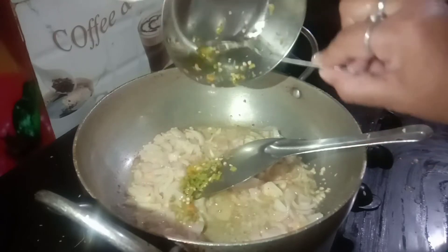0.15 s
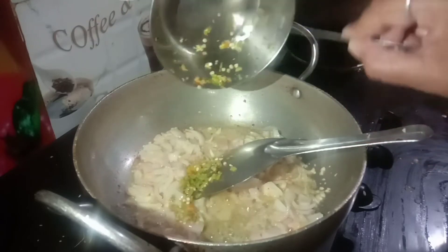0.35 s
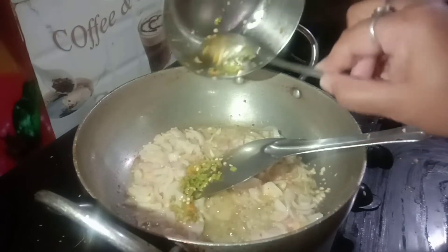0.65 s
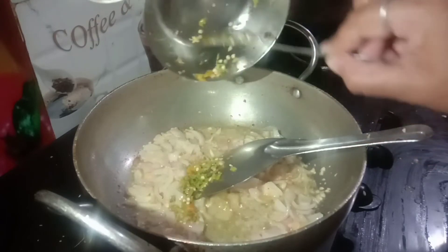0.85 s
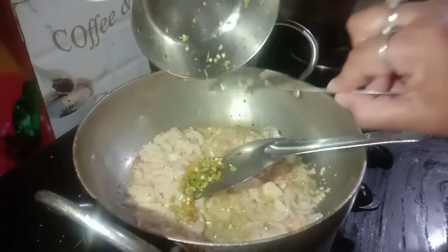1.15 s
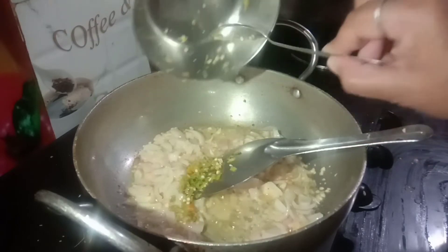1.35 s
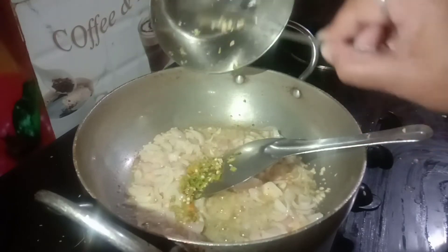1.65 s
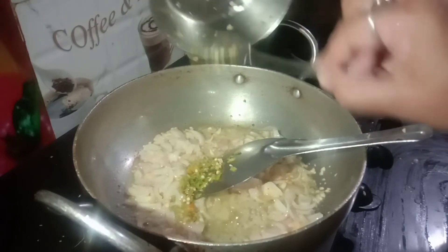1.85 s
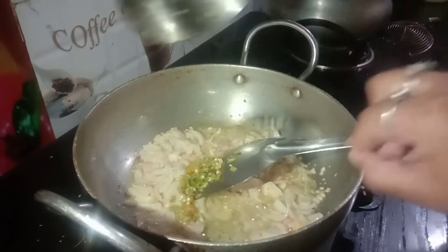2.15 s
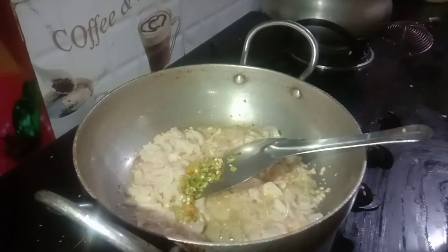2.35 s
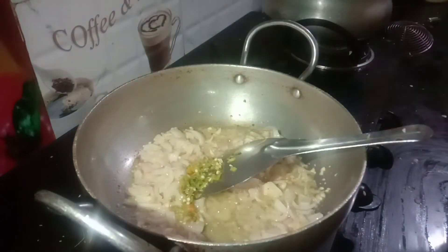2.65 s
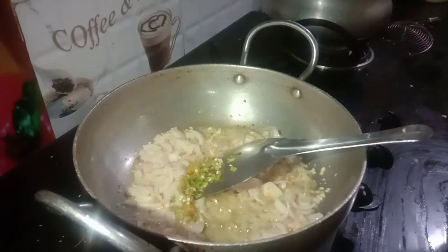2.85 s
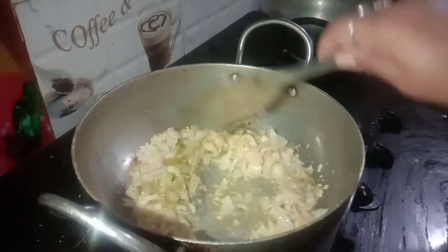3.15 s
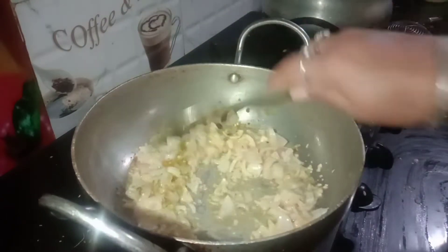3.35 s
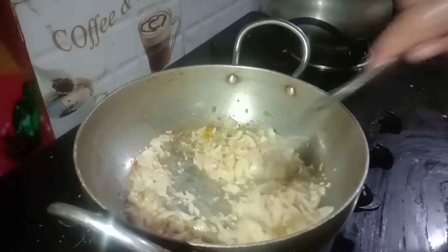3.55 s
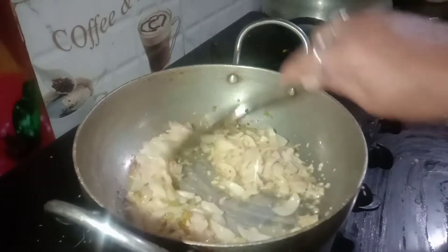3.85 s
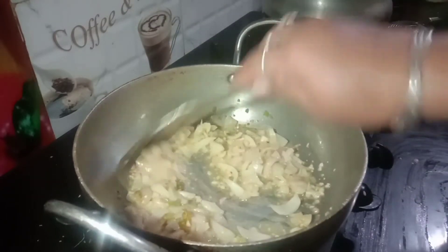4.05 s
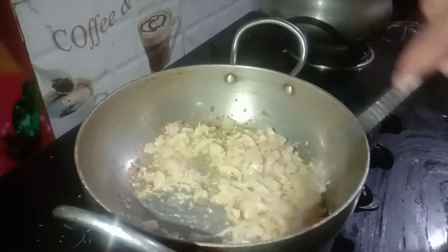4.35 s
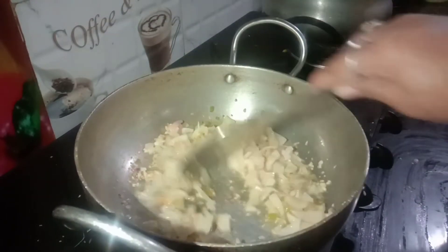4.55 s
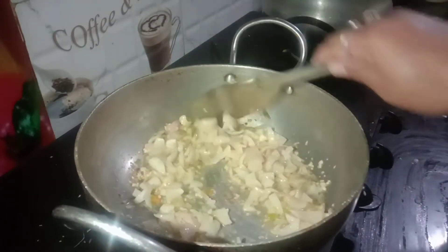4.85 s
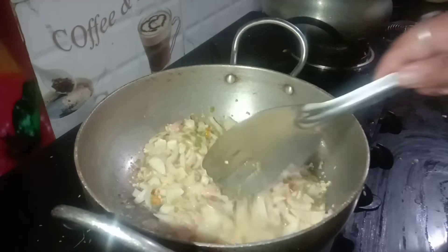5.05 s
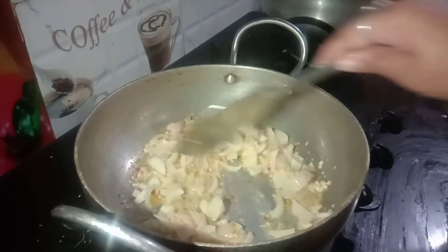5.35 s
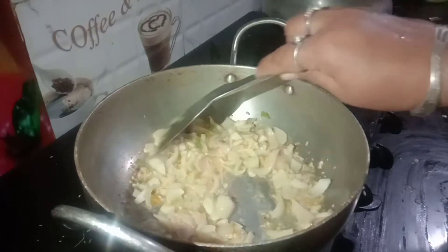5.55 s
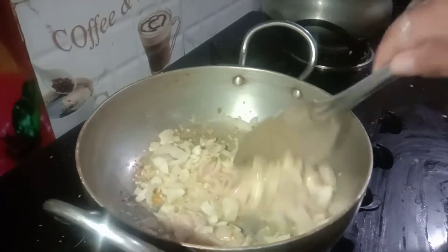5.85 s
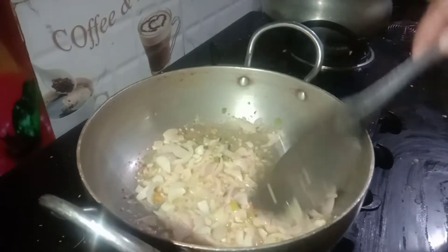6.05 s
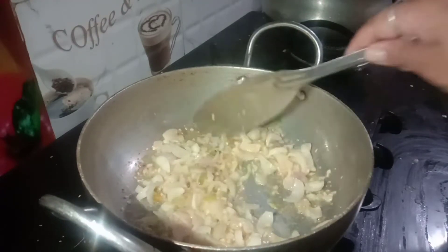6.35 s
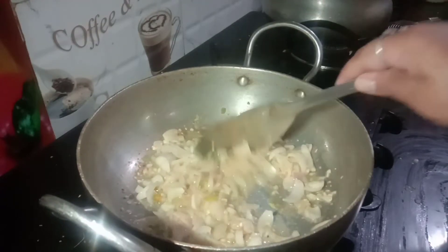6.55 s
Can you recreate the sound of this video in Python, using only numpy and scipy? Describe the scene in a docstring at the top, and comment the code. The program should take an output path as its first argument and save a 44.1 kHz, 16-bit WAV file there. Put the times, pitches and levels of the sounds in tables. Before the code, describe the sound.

Close crackling frying with small pops and spoon taps on a metal bowl, a brief dropout, then brisk metal spatula strokes scraping the pan.

```python
"""Onions sizzle in hot fat in a steel pan, close to the microphone in a small kitchen: random sparks over hiss.
A spoon clinks and rubs in a steel bowl (struck modes, stick-slip grit and squeals), while drops pop in the fat.
A hand reaches over the pan, and its delayed reflection hollows out the sizzle.
After a short break the sound fades back in with a louder frying, and a steel spatula knocks and scrapes
through the onions (noise through pan modes). A short room tail and a low hum lie behind; the sound drops out
again near the end."""
import sys
import numpy as np
from scipy import signal
from scipy.fft import rfft, irfft, next_fast_len
from scipy.io import wavfile
from scipy.ndimage import uniform_filter1d, minimum_filter1d, map_coordinates

SR = 44100
rng = np.random.default_rng(int(sys.argv[2]) if len(sys.argv) > 2 else 0)


def unload_wav(signal):
    """Save mono or channel-first audio to the path in sys.argv[1] as 16-bit WAV at rate SR, clipped to [-1, 1]."""
    wavfile.write(
        sys.argv[1],
        SR,
        np.round(np.clip(np.atleast_2d(signal).T, -1, 1) * 32767).astype(np.int16),
    )


N = 295227

# Levels in the tables are relative: the functions add fixed lifts, and the microphone colours the sum.
# Colour of the fat under still onions, and under turned ones: (frequency [Hz], level [dB])
RESTING_COLOUR = [(60, -32), (250, -9.5), (420, -10.5), (1000, -11.5), (1500, -2), (2150, 2), (2550, -3.5),
                  (2900, 2.5), (3600, 0.5), (5000, 1.5), (9000, -1), (13000, -4), (15000, -2.5)]
STIRRED_COLOUR = [(60, -13.5), (350, -18.5), (600, -14.5), (1050, -14.5), (1500, -11.5), (1900, -3.5),
                  (2300, -5.5), (2900, -3.5), (4000, -1.5), (5900, 1.5), (9000, -2), (15000, 0)]
# Loudest bursts of water in the fat: (time [s], level [dB], pitch [Hz], spray over that level [dB])
POPS = [(0.2646, -16.5, 2360, -1.5), (0.3317, -25, 5500, -1), (0.838, -17, 4800, 4.5),
        (1.9001, -19.5, 4950, 0), (1.9596, -16.5, 5550, 5), (1.9786, -19.5, 5780, 4),
        (2.1363, -25, 5700, 2), (2.2675, -25, 6180, -8), (2.3999, -25.5, 5470, 4), (2.6346, -24, 5820, 3.5),
        (2.824, -25, 6300, 7), (3.1255, -32, 4900, 9), (3.605, -15.5, 5670, 2), (4.8955, -11, 5570, -5)]
# Spray of a pop, and crack of a knock: (frequency [Hz], level [dB])
SPRAY_COLOUR = [(300, -13), (1800, 3), (5000, -7), (8000, -2), (13000, -1.5), (15500, -9)]
# Spoon meets bowl:
# (time [s], bowl ring [dB], spoon ring [dB], click [dB], most excited frequency [Hz])
CLINKS = [(.011, -28, -14.5, -13, 1210), (.153, -49, -16.5, -23, 3170), (.389, -23, -40, -19.5, 810),
          (1.699, -16, -42, -9.5, 2100), (1.75, -20.5, -37, -24, 4440)]
# Ringing modes of bowl and spoon: (frequency [Hz], level [dB], t60 [s])
BOWL_MODES = [(482.5, -3.5, 0.39), (1281, -3, .16), (1434, -4.5, 0.73), (2455, -8.5, 0.96), (3580, 2, 0.39),
              (3680, -3, 0.17), (3643, -4, 0.36), (4260, -9, 0.096), (5286, -8.5, 0.67), (5700, -16, 0.17)]
SPOON_MODES = [(870, 1.5, 0.066), (1570, 4.5, 0.051), (1470, -21, 0.13), (2373, 2, 0.51), (2405, 10, 0.073),
               (2585, -12.5, 0.82), (3700, -12.5, 0.304), (4950, -4, 0.2), (5580, 0.5, 0.23)]
# Spoon slides on the bowl's wall:
# (middle [s], half length [s], rub [dB], squeal frequency [Hz], squeal [dB])
RUBS = [(.05, 0.038, -36, 2990, -28), (.088, 0.026, -21.5, 5730, -23.5), (.21, 0.014, -28, 15200, -31),
        (.465, 0.024, -27, 15000, -25), (.67, 0.036, -26.5, 2370, -29), (1.434, 0.037, -33.5, 15000, -31.5),
        (1.758, 0.01, -29, 2395, -18.5), (1.785, 0.058, -26, 15200, -34)]
# Resonances of the rubbed wall: (frequency [Hz], width [Hz], level [dB])
RUB_MODES = [(2530, 77, -2), (3860, 50, 3), (5330, 170, 1), (5930, 50, -1), (7140, 240, -1),
             (8200, 320, -3.5), (8900, 170, 3), (10790, 290, 3.5), (13000, 430, 2), (15100, 250, -9.5),
             (15100, 200, 5.5)]
# Spatula strikes the pan: (time [s], click [dB], pan ring [dB], blade ring [dB], blade pitch [Hz])
KNOCKS = [(3.291, -18.5, -23.5, -15, 3940), (3.785, -3, -16, -9, 4200), (4.076, -5.5, -3, -25, 4350),
          (4.527, -14.5, -22, -26, 4420), (5.166, 4, -11.5, -4, 4280), (5.194, -4.5, -11.5, -2.5, 6000),
          (5.228, -19, -25, -1, 4370), (5.251, -8, -18, -6.5, 6030), (5.312, 3, -21, -1.5, 5500),
          (5.627, -15, -18.5, -18, 4440), (6.199, -12, -23, -19, 4400), (6.471, -6.5, -10, -18, 4200)]
# Spatula strokes: (landing [s], bearing down [s], hold [s], easing [dB/s], scrape [dB], push [dB],
# surge of the frying [dB])
STROKES = [(3.297, 0.091, 0.028, 50, -36, -51, 2.5), (3.779, 0.07, .02, 81, -34.5, -37.5, 1.5),
           (4.065, 0.041, 0.038, 76, -28.5, -58, 0.5), (4.207, 0.055, .03, 110, -48.5, -42, 1.5),
           (4.525, 0.021, 0.015, 70, -43.5, -45, 2), (4.813, 0.016, 0.093, 120, -50, -47, 2.5),
           (5.173, 0.032, 0.063, 398, -29, -48.5, 1.1), (5.32, 0.048, 0.018, 69, -41, -61, 3.5),
           (5.609, .06, 0.031, 60, -38.5, -51, 2.5), (6.134, 0.099, .02, 44, -46.5, -46, 1.05),
           (6.456, 0.033, 0.029, 69, -36.5, -49.5, 0)]
# Bare edge grinds on steel and makes the pan groan or squeal:
# (middle [s], half length [s], grind [dB], tone [Hz], tone level [dB])
GRINDS = [(3.427, 0.01, -18.5, 3430, -24), (3.85, 0.038, -24.5, 307, -24), (4.135, 0.072, -33, 1235, -22),
          (5.205, 0.017, -11.5, 1263, -15.5), (5.263, 0.019, -15, 2695, -18), (6.54, 0.056, -30, 771, -32)]
# Resonances of the pan, and of the pan rocking on the stove: (frequency [Hz], width [Hz], level [dB])
PAN_MODES = [(318, 6.3, -5), (457, 14, 0.5), (662, 14, 4), (686, 9.9, 3.5), (803, 41, -13.5),
             (866, 16.4, 10.5), (947, 47, -1.5), (1110, 43, 1.5), (1222, 51, 6), (1516, 99, 1),
             (1730, 310, -4.5), (2135, 150, -1), (2620, 240, -8.5)]
STOVE_MODES = [(96, 9.9, -3), (133.4, 16.5, -4.5), (216, 9.9, -10.5), (305.5, 12.4, -4)]
# Dull share of the scraping, and the bright contact of steel edges: (frequency [Hz], level [dB])
SCRAPE_COLOUR = [(100, -26), (250, -1.5), (500, 6), (800, 7), (1500, -3), (3000, -12), (7000, -3.5),
                 (16000, -37)]
EDGE_COLOUR = [(150, -36), (600, -14), (1300, -7.5), (2200, -2), (3000, -2.5), (4400, -3), (6000, -8.5),
               (9000, -10.5), (16000, -14)]
# The nearing hand mirrors the sizzle: (time [s], first cancelled frequency [Hz], reflected share [0-1])
HAND = [(2.3, 2400, 0), (2.7, 2480, .55), (2.88, 2650, .8), (3.0, 2950, .9), (3.07, 3150, .9),
        (3.13, 2850, .7), (3.17, 2600, .55), (3.25, 2600, 0)]
# Low hum of the room: (frequency [Hz], level [dB])
HUM_COLOUR = [(20, -38), (55, -14), (85, 2.5), (100, 4), (130, -1), (170, -8), (400, -34.5), (2000, -54)]
# Decay of the kitchen: (frequency [Hz], t60 [s])
KITCHEN_DECAY = [(150, 0.45), (2000, 0.25), (12000, 0.1)]
# Response of the microphone: (frequency [Hz], level [dB])
MICROPHONE = [(30, -22), (100, -13), (2500, -11.5), (4000, -7.5), (5300, -4.5), (5900, -0.5), (6350, -5),
              (6800, -11.5), (7400, -12), (8200, -19.5), (11000, -23), (13800, -24.5), (14600, -10.5),
              (15500, -13)]
# Drop-outs: (start [s], end [s], level [dB])
BREAKS = [(3.172, 3.203, -37), (6.629, 6.7, -44)]

TOP_HZ = 15650  # middle of the upper band limit
# Still onions: starting level, its slow fall, and the lift under a fully reflecting hand
RESTING_DB, SETTLING_DB_PER_S, COVER_DB = -29.5, 0.78, 3
# Turned onions: the sound fades in to a steady frying level, with a surge after each push
TURNING_S, FADE_IN_FULL_S, FADE_IN_DB_PER_S, STIRRED_DB, SURGE_LAG_S = 3.19, 3.42, 108, -21, 0.088
# Pressure at first touch against full pressure; sharp crack of a knock over the table's click level
LANDING_DB, CRACK_DB = -3.5, 6
# Gain control: threshold, share of the excess taken off, speed of recovery
LIMIT_DB, SQUEEZE, RECOVERY_DB_PER_S = -20.5, 0.57, 133


def amp(db):
    """Decibels to gain."""
    return 10 ** (np.asarray(db) / 20)


def unit(x):
    """Scale to rms 1."""
    return x / np.sqrt(np.mean(x ** 2) + 1e-20)


def clock():
    """The time of every sample [s]."""
    return np.arange(N) / SR


def since(s):
    """Seconds gone by since s, zero before it."""
    return np.maximum(clock() - s, 0)


def along(points, hz):
    """Interpolate (frequency, value) points on a log frequency axis."""
    f, v = np.transpose(points)
    return np.interp(np.log(hz + 1), np.log(f + 1), v)


def curves(rows):
    """One value per sample for each column after the time."""
    s, *columns = np.transpose(rows)
    return [np.interp(clock(), s, column) for column in columns]


def wobble(rate):
    """A smooth random curve with rate knots a second."""
    knots = rng.standard_normal(int(N * rate / SR) + 4)
    return map_coordinates(knots, [np.arange(N) * rate / SR])


def filtered(x, response):
    """Multiply the spectrum of x by a complex response of frequency."""
    size = next_fast_len(len(x) + SR // 4, real=True)
    spectrum = rfft(x, size) * response(np.fft.rfftfreq(size, 1 / SR))
    return irfft(spectrum, size)[:len(x)]


def coloured(x, points, size=4096):
    """Causal minimum-phase filter with the gain of (Hz, dB) points."""
    cepstrum = irfft(np.log(amp(along(points, np.fft.rfftfreq(size, 1 / SR)))))
    # folding the cepstrum forward in time makes the filter causal
    cepstrum[1:size // 2] *= 2
    cepstrum[size // 2 + 1:] = 0
    impulse = irfft(np.exp(rfft(cepstrum)))[:size // 2]
    return signal.fftconvolve(x, impulse)[:len(x)]


def resonate(x, modes):
    """Pass x through parallel resonances of alternating sign: (Hz, width Hz, dB)."""
    def response(f):
        total = 0
        for k, (centre, width, db) in enumerate(modes):
            damping = 1j * f * width
            total = total + (-1) ** k * amp(db) * damping / (centre * centre - f * f + damping)
        return total
    return filtered(x, response)


def add(track, s, sound):
    """Mix a sound into the track at time s."""
    part = track[max(round(s * SR), 0):][:len(sound)]
    part += sound[:len(part)]


def burst(t60):
    """Half a second of noise that dies away."""
    t = np.arange(SR // 2) / SR
    return rng.standard_normal(len(t)) * amp(-60 * t / t60)


def swell(middle, half):
    """A bell-shaped rise and fall."""
    return np.exp(-.5 * ((clock() - middle) / half) ** 2)


def sparks(rate, spread_db):
    """Random impulses of rms 1, rate a second: many small, a few large."""
    size = amp(spread_db * np.minimum(rng.standard_normal(N), np.pi))
    struck = rng.random(N) < rate / SR
    return unit(size * rng.choice([-1, 1], N) * struck)


def fizz(spectrum, rate, spread_db, hiss_db):
    """Tiny steam bubbles burst over a hiss of countless smaller ones."""
    hiss = amp(hiss_db) * rng.standard_normal(N)
    return unit(coloured(sparks(rate, spread_db) + hiss, spectrum))


def surges():
    """Each stroke lays wet onion on hot steel: the frying swells and settles again [dB]."""
    total = np.zeros(N)
    for s, rise, *_, surge_db in STROKES:
        age = since(s) / (rise + SURGE_LAG_S)
        total += surge_db * age * np.exp(1 - age)
    return total


def frying():
    """The fat fizzes quietly, then, after the break, fades in louder over turned onion."""
    t, cover = clock(), curves(HAND)[1]
    resting_db = RESTING_DB - SETTLING_DB_PER_S * t + COVER_DB * cover
    fade_in_db = FADE_IN_DB_PER_S * np.minimum(t - FADE_IN_FULL_S, 0)
    stirred_db = STIRRED_DB + fade_in_db + surges()
    resting = amp(resting_db) * fizz(RESTING_COLOUR, rate=2300, spread_db=7.5, hiss_db=2.5)
    stirred = amp(stirred_db) * fizz(STIRRED_COLOUR, rate=3500, spread_db=6.0, hiss_db=1.5)
    sizzle = np.where(t < TURNING_S, resting, stirred) * amp(0.93 * wobble(30))
    # the hollow of the pan gives one vowel-like note, stronger when the hand covers it
    hollow = resonate(sizzle * amp(6.5 * cover), [(1245.7, 41.0, 18)])
    return sizzle + hollow


def room_hum():
    """Steady low noise of the room behind the pan."""
    return amp(-54.5) * unit(coloured(rng.standard_normal(N), HUM_COLOUR))


def kitchen(x):
    """A short tiled-room tail; the treble dies first."""
    hz, t, z = signal.stft(rng.standard_normal(SR // 2), SR, nperseg=256)
    decay = amp(-60 * t / along(KITCHEN_DECAY, hz)[:, None])
    tail = signal.istft(z * decay, SR, nperseg=256)[1]
    delayed = np.pad(tail, (SR // 300, 0))  # the tail starts 3.3 ms after the direct sound
    return signal.fftconvolve(x, delayed / np.linalg.norm(tail))[:N]


def ring(modes, centre_hz, octaves):
    """Struck steel: the place of contact favours the modes around one pitch."""
    t = np.arange(SR * 3 // 4) / SR
    total = np.zeros(len(t))
    for hz, db, t60 in modes:
        favour = np.exp(-.5 * (np.log2(hz / centre_hz) / octaves) ** 2)
        decay = amp(db + rng.standard_normal() - 60 * t / t60)
        total += favour * decay * np.sin(2 * np.pi * (hz * t + rng.random()))
    return total


def shimmer(count):
    """The crowd of weak, short modes of thin steel; every contact finds different ones."""
    t = np.arange(SR // 2) / SR
    total = np.zeros(len(t))
    for pitch, life, phase in rng.random((count, 3)):
        decay = amp(-60 * t / (0.042 + 0.16 * life))
        total += decay * np.sin(2 * np.pi * ((800 + 5500 * pitch) * t + phase))
    return unit(total)


def tink(hz):
    """A hand-held steel edge rings for a moment."""
    t = np.arange(SR // 10) / SR
    return np.sin(2 * np.pi * hz * t) * amp(-60 * t / 0.028) * (1 - np.exp(-t / 0.001))


def sliding(rows, wall, waver, waver_rate):
    """Steel sticks and slips on steel: a gritty swell with a rough squeal, its phase wavering [rad]."""
    out = np.zeros(N)
    phase = waver * wobble(waver_rate)
    strength = amp(4.8 * wobble(100))
    for s, half, db, hz, squeal_db in rows:
        squeal = strength * np.sin(2 * np.pi * hz * clock() + phase)
        out += swell(s, half) * (amp(db) * wall + amp(squeal_db) * squeal)
    return out


def spoon():
    """The spoon taps the bowl and slides, squealing, along its wall."""
    rings, clicks = np.zeros((2, N))
    for s, bowl_db, spoon_db, click_db, hz in CLINKS:
        add(rings, s, amp(bowl_db) * ring(BOWL_MODES, hz, octaves=0.94))
        add(rings, s, amp(spoon_db) * ring(SPOON_MODES, hz, octaves=0.49))
        add(rings, s, amp(click_db - 27.5) * shimmer(count=36))
        add(rings, s, amp(click_db) * tink(6250))
        add(clicks, s, amp(click_db + 4) * burst(t60=0.053))
    slips = sparks(rate=2000, spread_db=3.0)
    grit = unit(resonate(slips, RUB_MODES) + amp(-5.5) * coloured(slips, EDGE_COLOUR))
    wall = grit * amp(4.9 * wobble(110))
    return rings + coloured(clicks, EDGE_COLOUR) + sliding(RUBS, wall, waver=1.1, waver_rate=360)


def ping(hz):
    """A few cycles that swell and soon die away, faster at a higher pitch."""
    t = np.arange(SR // 50) / SR
    age = hz * t / 1.1  # the swell peaks after 1.1 cycles
    return np.sin(2 * np.pi * hz * t) * age * np.exp(1 - age)


def pops():
    """Larger drops burst with a trace of spray and, a millisecond later, a ping."""
    pings, spray = np.zeros((2, N))
    for s, db, hz, spray_db in POPS:
        add(pings, s + 0.001037, amp(db + 7) * ping(hz))
        add(spray, s, amp(db + spray_db) * burst(t60=0.022))
    return pings + coloured(spray, SPRAY_COLOUR)


def past_hand(x):
    """The hand's echo comes half a cycle late at one pitch and weakens it."""
    notch_hz, share = curves(HAND)

    def mirror(hz):
        # long waves bend round the hand, and its curves scatter the shortest ones
        return 1 / (1 + (900 / (hz + 1)) ** 4) / (1 + (hz / 6200) ** 6)
    half_cycle = SR / (2 * notch_hz)  # samples
    echo = map_coordinates(filtered(x, mirror), [np.arange(N) - half_cycle])
    return (x + share * echo) / np.sqrt(1 + share ** 2)


def through_pan(x, dull_db):
    """The pan's modes, plus the dull share that the onions damp."""
    return resonate(x, PAN_MODES) + amp(dull_db) * coloured(x, SCRAPE_COLOUR)


def knocks():
    """The blade strikes the pan: click, sharp crack, and both pieces of steel ringing."""
    clicks, cracks, blows, blade = np.zeros((4, N))
    for s, click_db, pan_db, blade_db, hz in KNOCKS:
        add(clicks, s, amp(click_db + 5) * burst(t60=0.039))
        add(cracks, s, amp(click_db + CRACK_DB) * burst(t60=0.0038))
        add(blade, s, amp(blade_db) * tink(hz))
        add(blows, s, amp(pan_db + 14.5) * burst(t60=0.024))
        add(blows, s, amp(pan_db + 2.5) * ping(1240))
    contact = coloured(clicks, EDGE_COLOUR) + coloured(cracks, SPRAY_COLOUR)
    return blade + through_pan(blows, dull_db=-3.5) + contact


def pressure(s, rise, hold, easing_db_per_s):
    """The force on the blade, 1 at its fullest: it lands lightly, bears down, holds and eases off."""
    age = since(s)
    db = LANDING_DB * np.maximum(1 - age / rise, 0) - easing_db_per_s * since(s + rise + hold)
    return amp(db) * np.minimum(age / .004, 1)


def strokes():
    """The blade drags over the steel under pressure and rocks the pan on the stove."""
    scrape, push = np.zeros((2, N))
    for s, rise, hold, easing, scrape_db, push_db, _ in STROKES:
        force = pressure(s, rise, hold, easing)
        scrape += force * amp(scrape_db + 10.5)
        push += force * amp(push_db + 8.5)
    chatter = amp(1.8 * wobble(60))
    drag = scrape * chatter * unit(through_pan(sparks(rate=3500, spread_db=5.0), dull_db=-5))
    rocking = push * unit(resonate(sparks(rate=1800, spread_db=3.5), STOVE_MODES))
    return drag + rocking


def grinds():
    """The bare edge sticks and slips on the steel, with groans and squeals."""
    grit = unit(coloured(sparks(rate=8800, spread_db=-1), EDGE_COLOUR))
    return sliding(GRINDS, grit, waver=0.77, waver_rate=160)


def gain_control(x):
    """The gain ducks just ahead of a loud blow and creeps back up."""
    power = uniform_filter1d(x ** 2, size=160)
    excess_db = np.maximum(10 * np.log10(np.abs(power) + 1e-12) - LIMIT_DB, 0)
    recovered_db = RECOVERY_DB_PER_S * clock()
    # a running maximum over a rising ramp: instant ducking, steady recovery
    gain_db = recovered_db - np.maximum.accumulate(SQUEEZE * excess_db + recovered_db)
    early_db = minimum_filter1d(gain_db, size=700)
    return x * amp(uniform_filter1d(early_db, size=600))


def drop_outs():
    """A gain that dips for the short breaks, with slightly rounded edges."""
    gain = np.ones(N)
    for start, end, db in BREAKS:
        gain[(clock() > start) & (clock() < end)] = amp(db)
    return uniform_filter1d(gain, size=64)


def scene():
    """Everything reaches one close microphone, over the room tail and a low hum."""
    near = frying() + spoon() + pops() + knocks() + strokes() + grinds()
    mono = past_hand(near + amp(-15.5) * kitchen(near)) + room_hum()
    return np.array([mono, mono])


def record(dry):
    """The microphone's port resonances, gain control, brief drop-outs and the band limit."""
    gain = drop_outs()

    def low_pass(hz):
        return np.clip((TOP_HZ - hz) / 200 + .5, 0, 1)
    sides = []
    for side in dry:
        levelled = gain_control(coloured(side, MICROPHONE))
        sides.append(filtered(gain * levelled, low_pass))
    return np.array(sides)


dry = scene()
out = record(dry)
unload_wav(out)
```